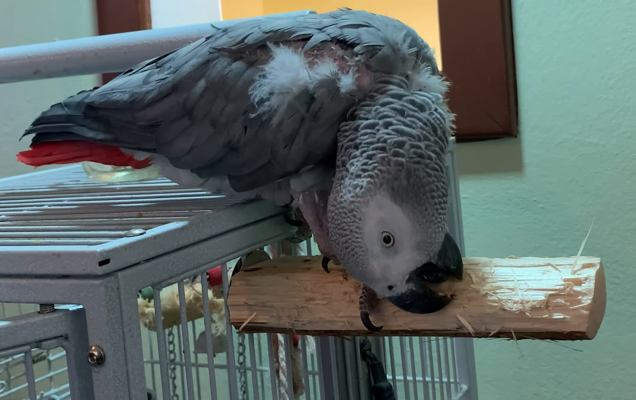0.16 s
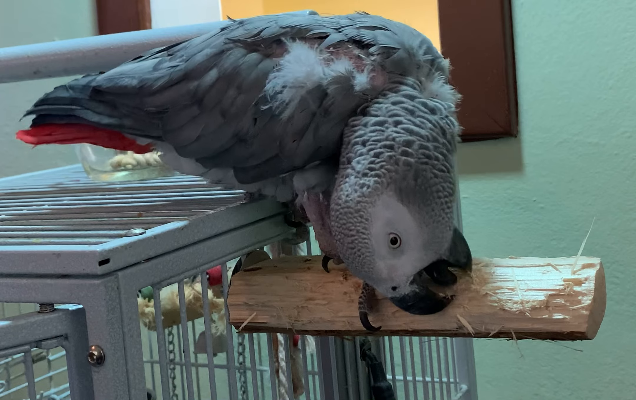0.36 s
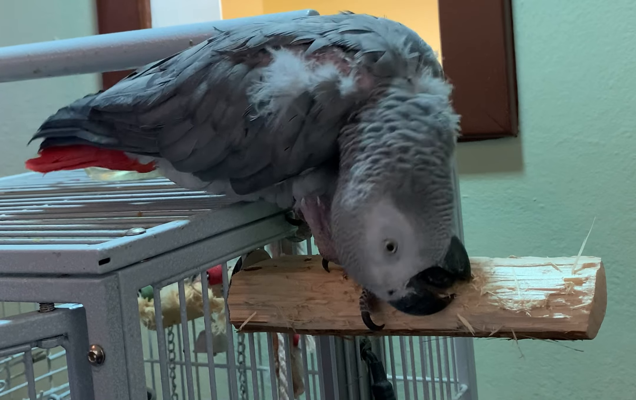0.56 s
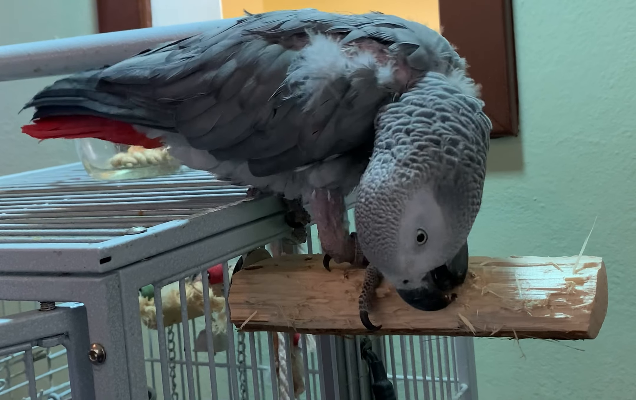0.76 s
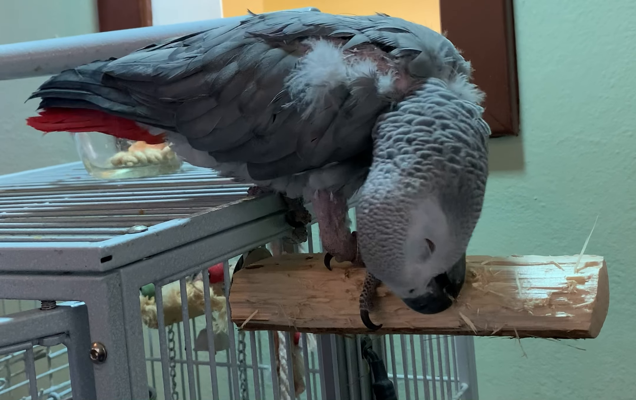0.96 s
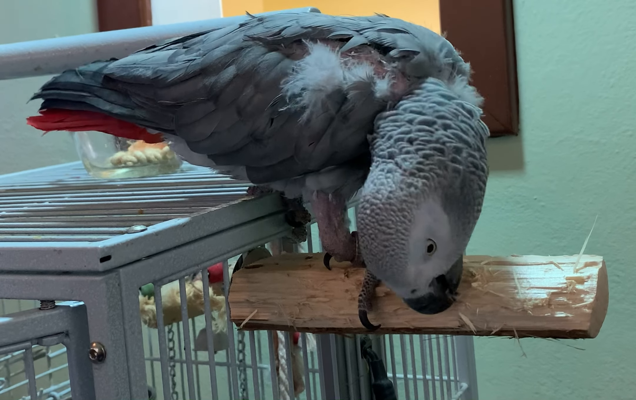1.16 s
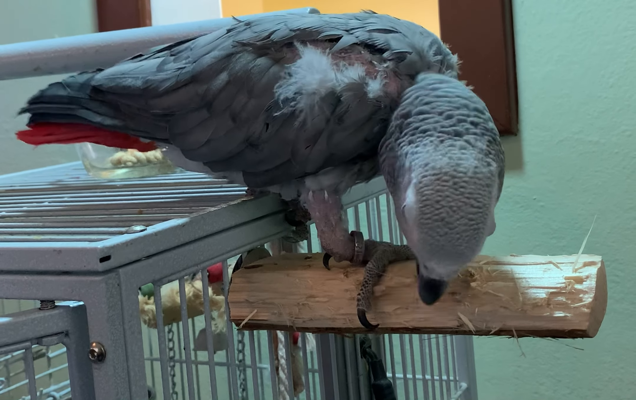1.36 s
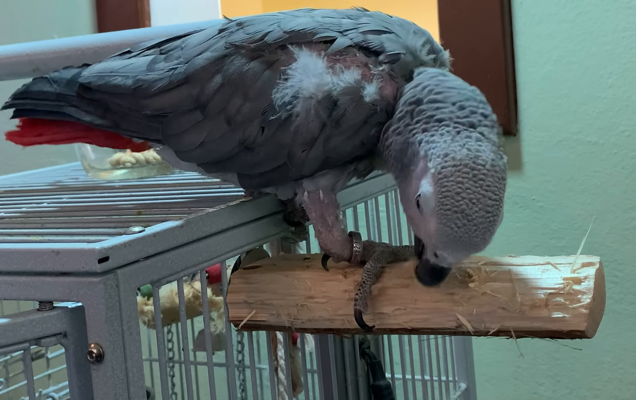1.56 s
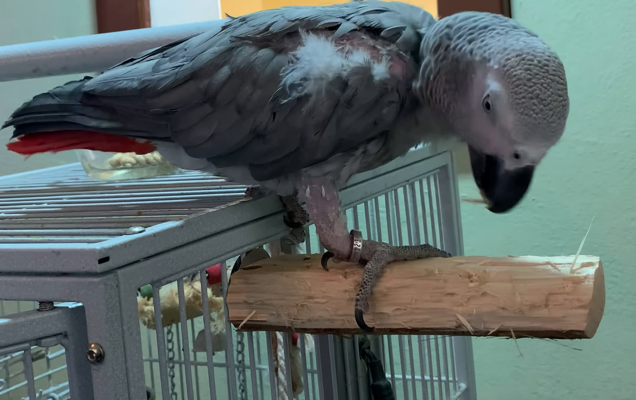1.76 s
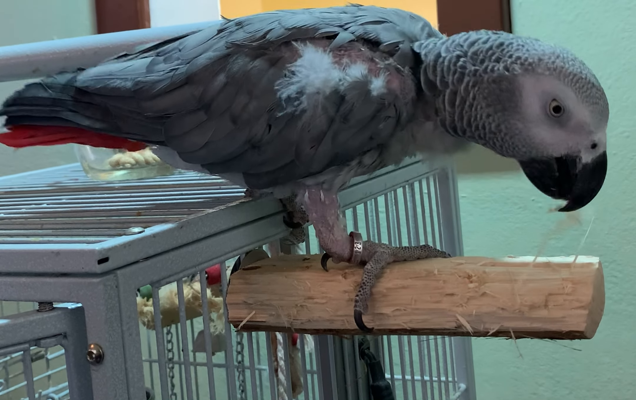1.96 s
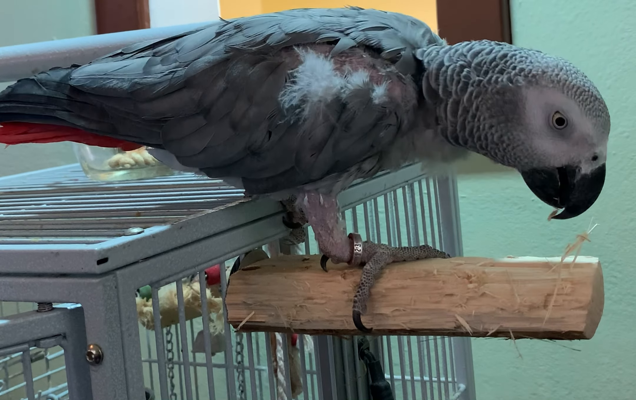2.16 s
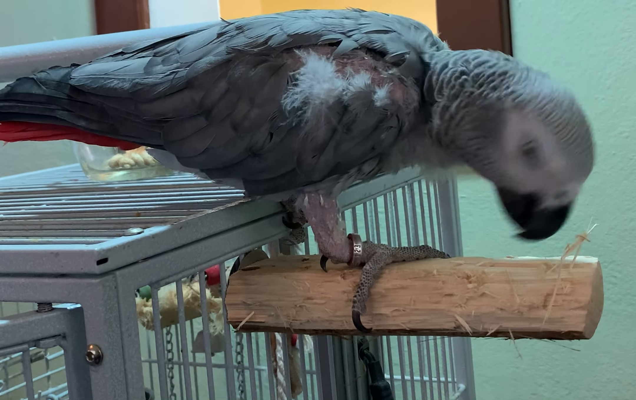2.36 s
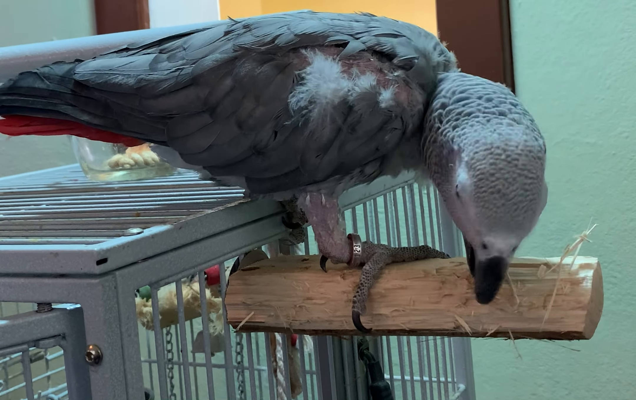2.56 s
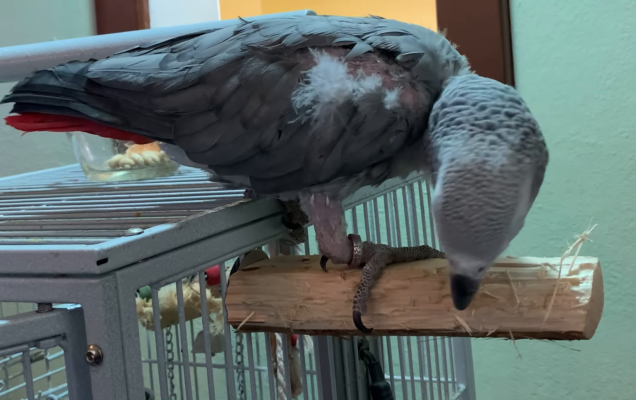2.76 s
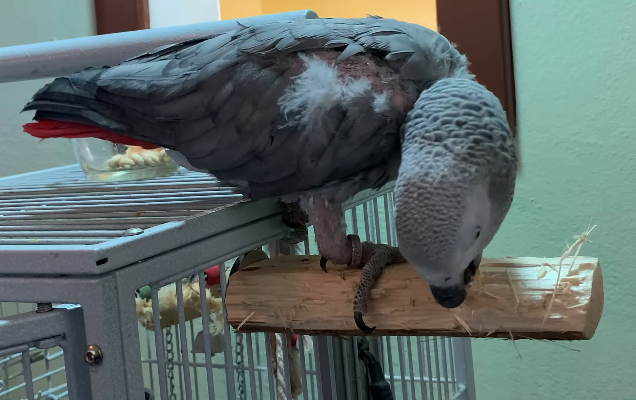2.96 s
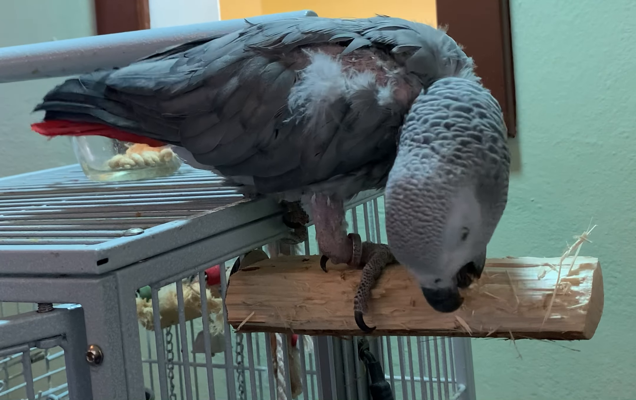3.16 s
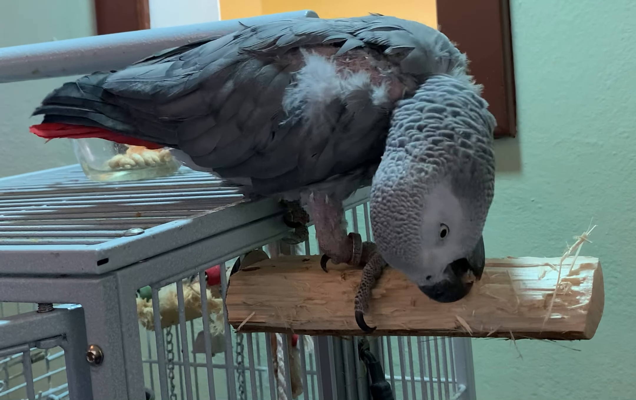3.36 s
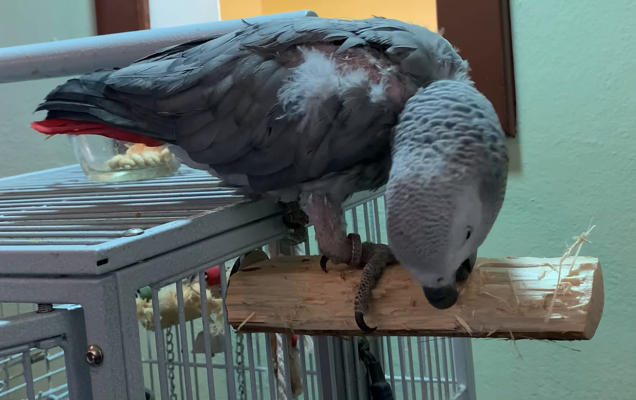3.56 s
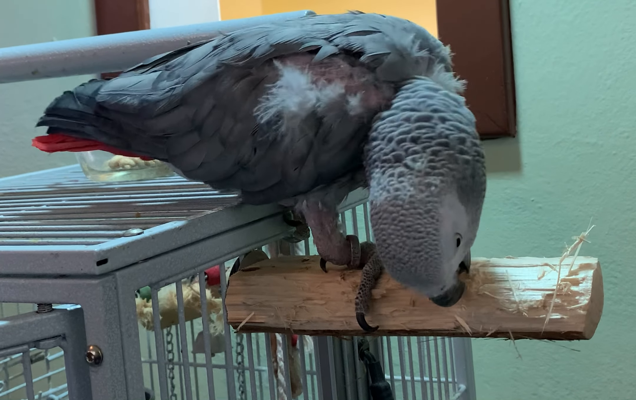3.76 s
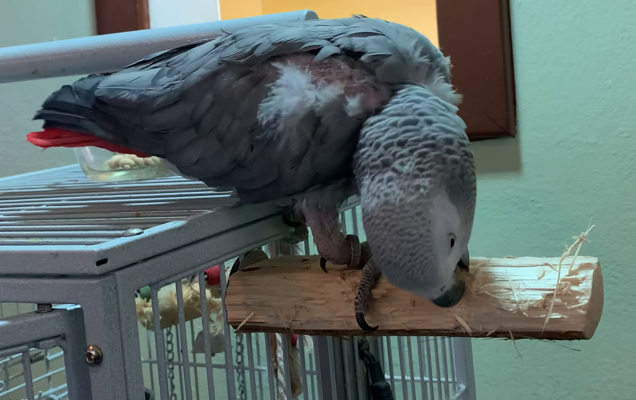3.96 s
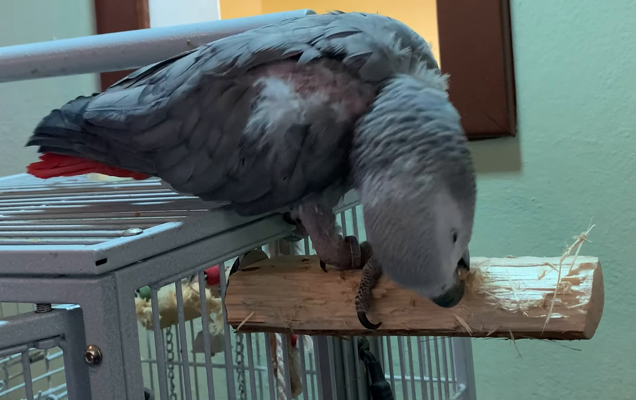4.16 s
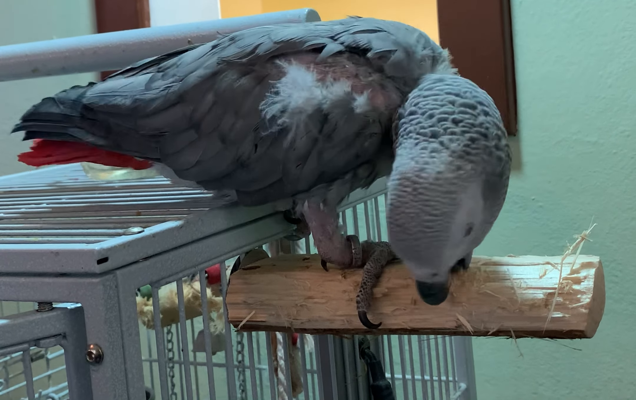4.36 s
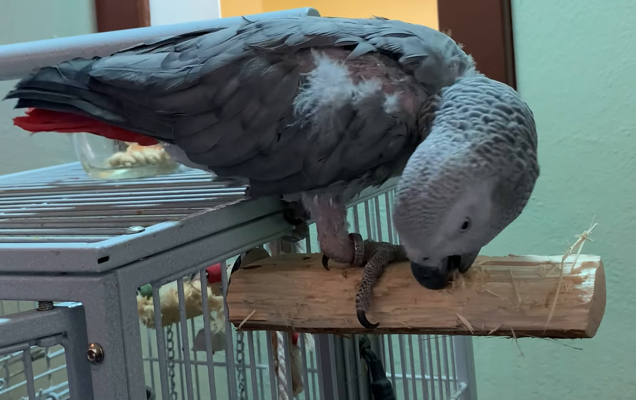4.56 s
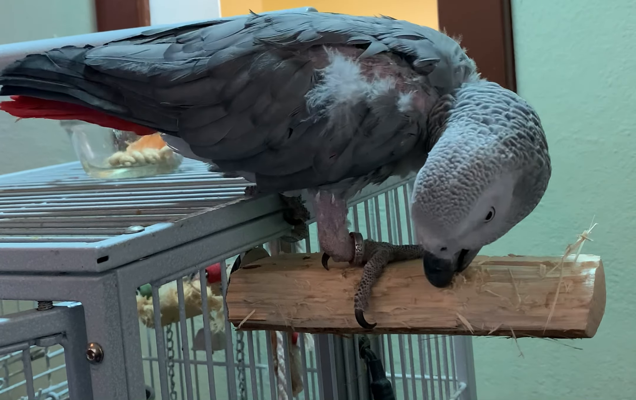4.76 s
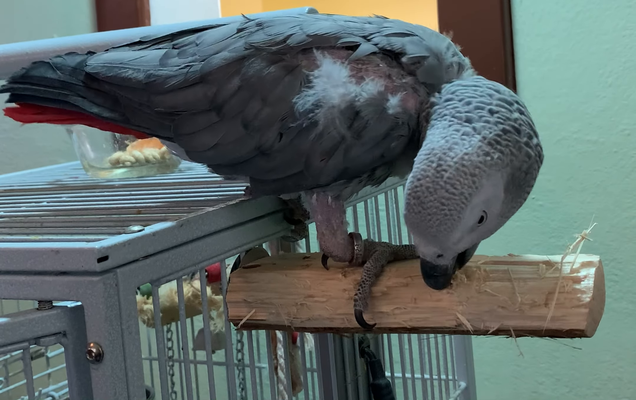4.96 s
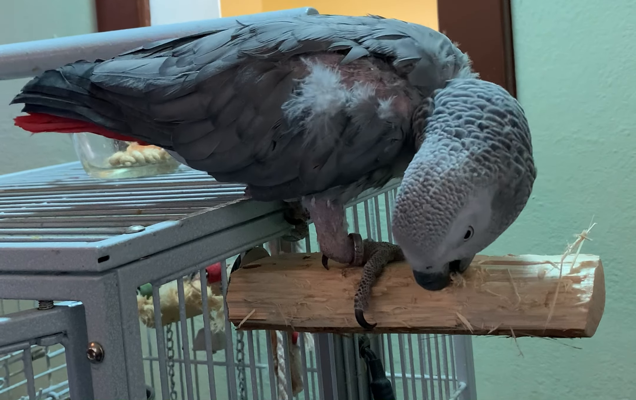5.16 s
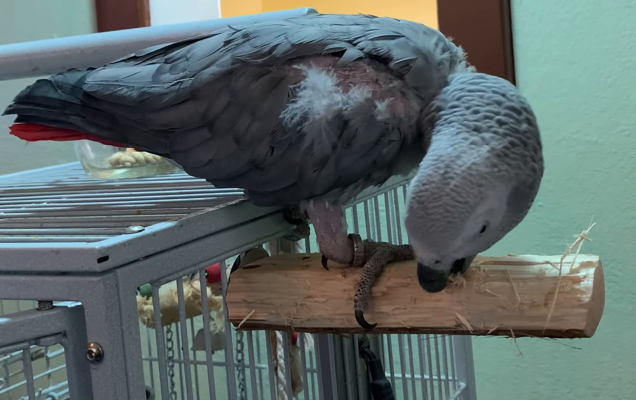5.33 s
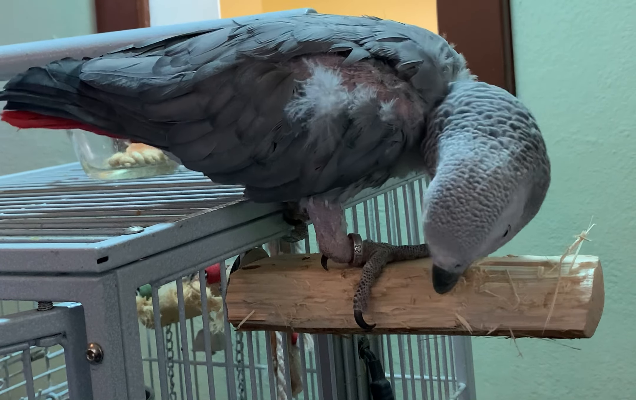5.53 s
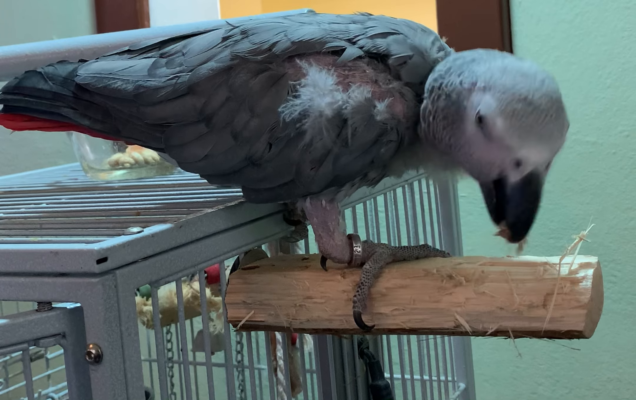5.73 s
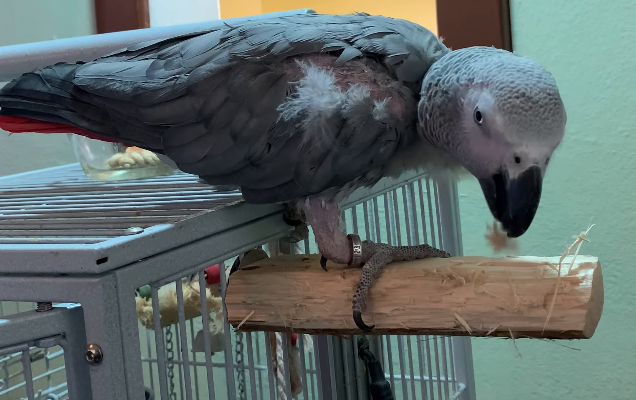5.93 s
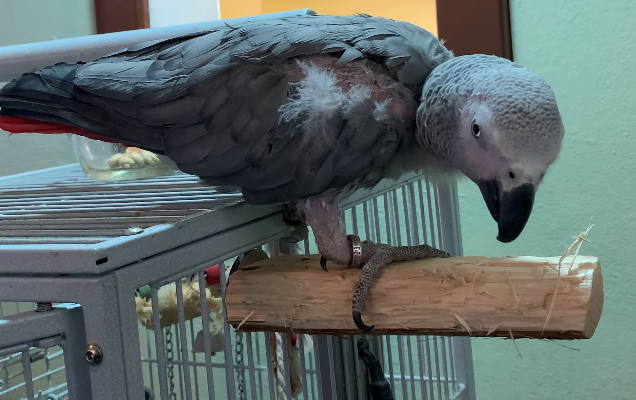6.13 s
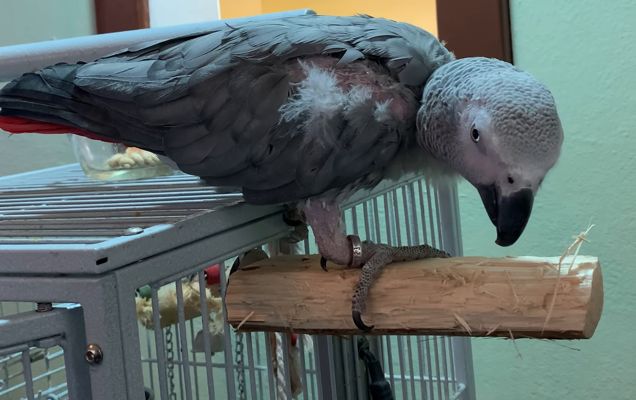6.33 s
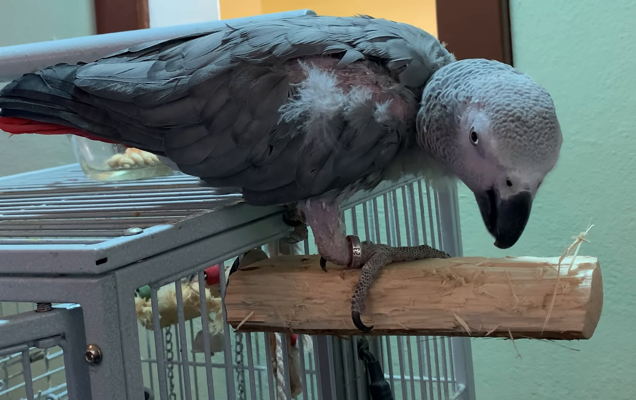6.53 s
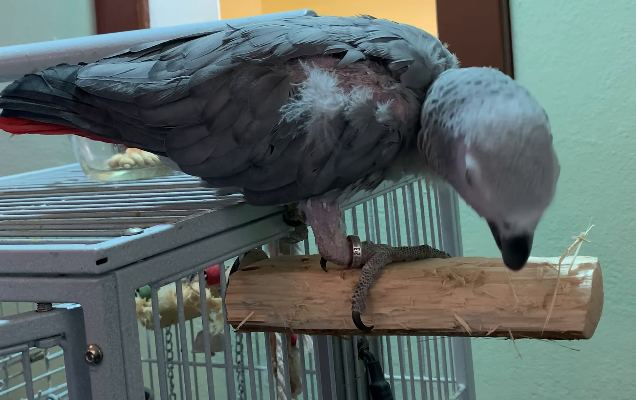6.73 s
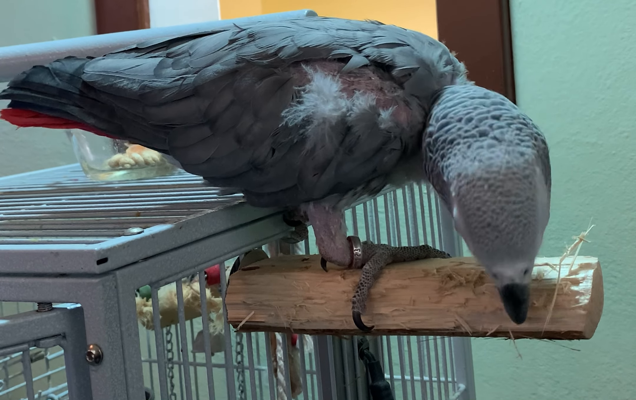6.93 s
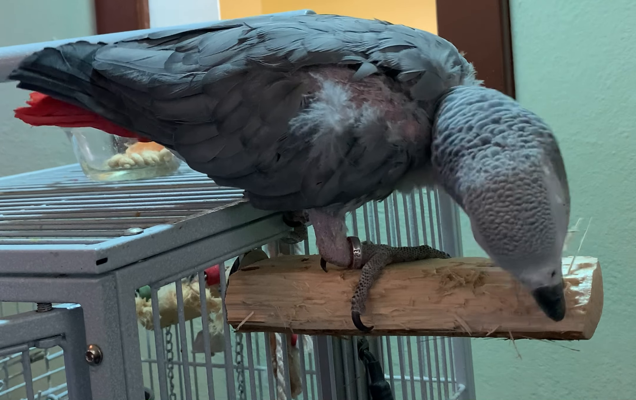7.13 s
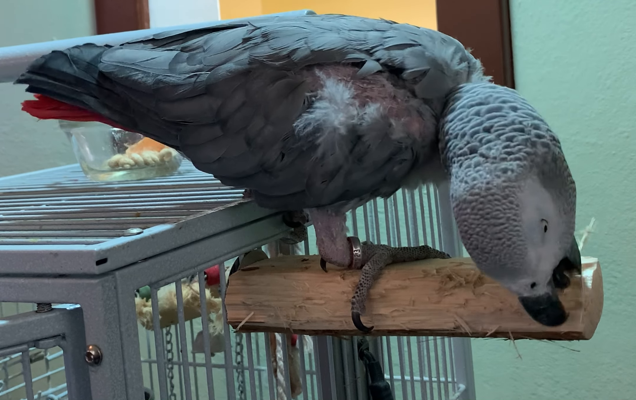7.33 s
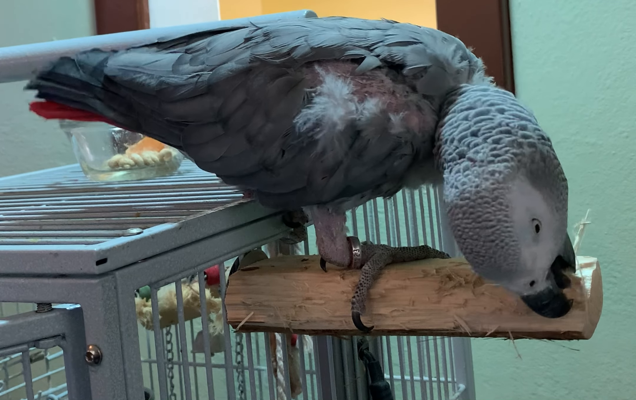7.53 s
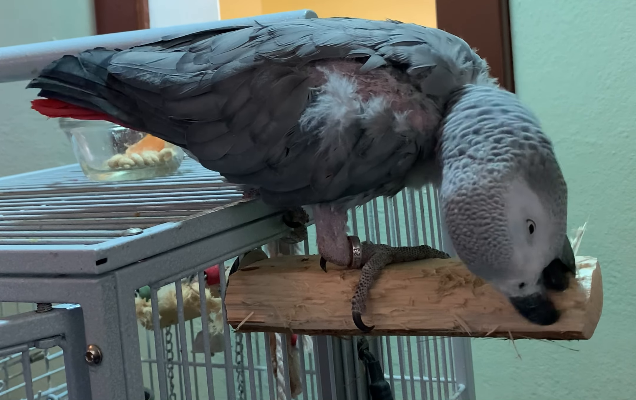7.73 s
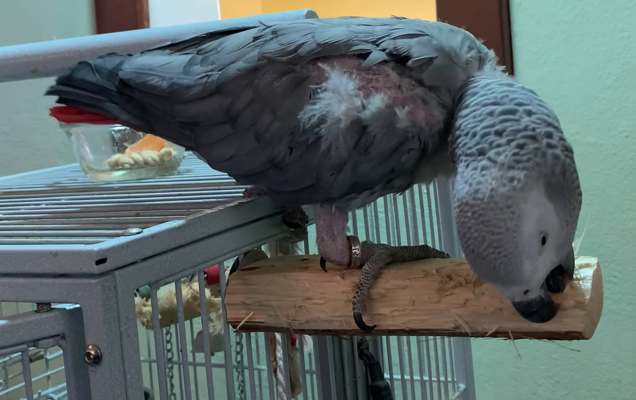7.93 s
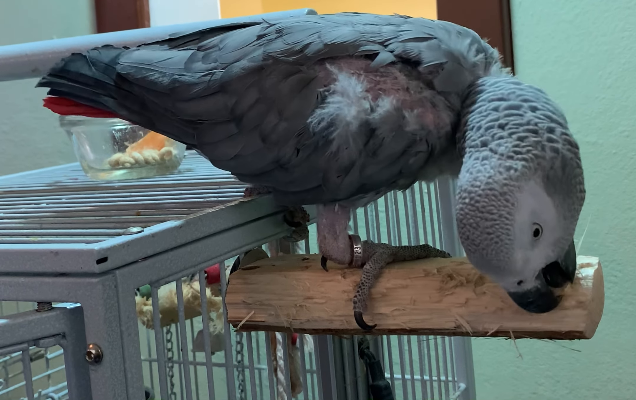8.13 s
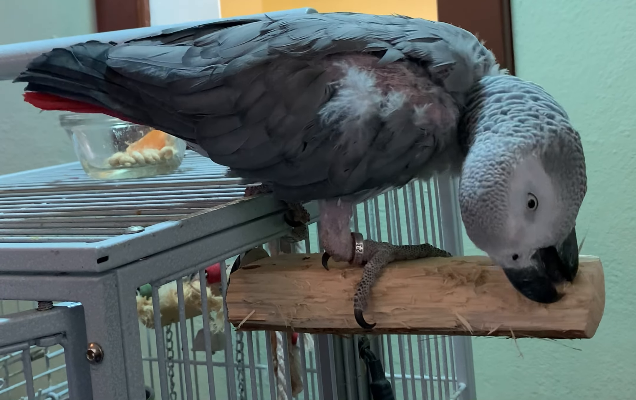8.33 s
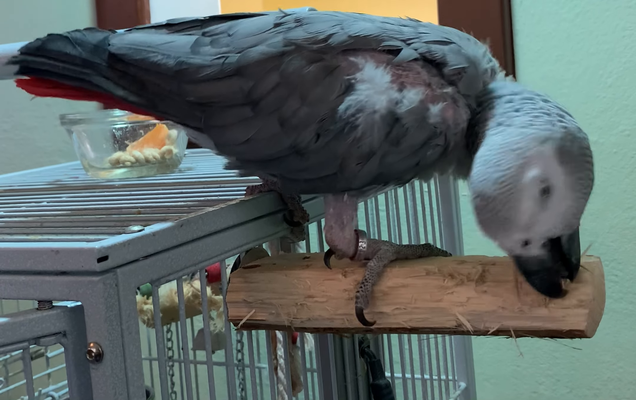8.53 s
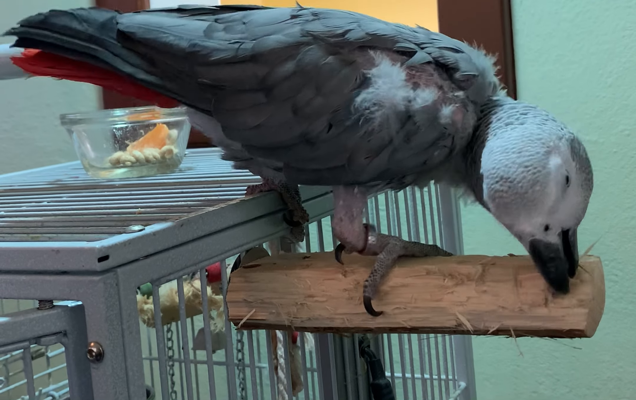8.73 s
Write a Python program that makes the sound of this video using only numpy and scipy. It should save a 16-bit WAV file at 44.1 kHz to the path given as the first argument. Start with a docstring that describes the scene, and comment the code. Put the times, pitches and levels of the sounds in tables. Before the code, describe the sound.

A parrot gnaws a wooden perch in a quiet indoor room, heard close in stereo over a soft, wavering low hum. From 0 to 1.8 s come uneven bites: fine dry crackle, ticking splinters, hollow little knocks around 0.5 and 0.9 s, sharp snaps near 1.6 s, and very faint brief beak squeaks. From 1.8 to 2.8 s it is nearly still, with only faint ticks. Gnawing returns at 2.9 s, with a dense crunching cluster at 3.2-3.8 s, a strong crack at about 4.5 s, lighter nibbling around 5 s, and hard snaps at 5.5 and 5.6 s. Mostly hum remains from 5.75 until 7.1 s. Then bright tearing resumes, snapping at 7.5 and 7.65 s, cracking sharply at 8.0 s, and ending in thick, fizzy, crisp crunching from 8.4 to 8.8 s. Short reflections and a light cage ring surround the wood.

```python
"""In a quiet room, a parrot gnaws a wooden perch on top of its cage.
Each bite tears fibres in fine crackle (noise grains) and grates the perch; splinters snap as short bursts.
The snaps jolt the perch into hollow knocks or ticks (decaying modes) and the cage rings on; the beak
squeaks briefly (unsteady sines). A low hum (narrow bands of noise) stands out of the room's air. Reflections
and a fading tail surround the wood, all heard in stereo, the right channel lagging in the treble."""
import sys
import numpy as np
from scipy import signal
from scipy.fft import rfft, irfft, next_fast_len
from scipy.io import wavfile

SR = 44100
rng = np.random.default_rng(int(sys.argv[2]) if len(sys.argv) > 2 else 0)


def store_wav(level_fs):
    """Save 16-bit WAV to argv[1]."""
    pcm = np.round(np.clip(np.atleast_2d(level_fs), -1, 1) * 32767)
    wavfile.write(sys.argv[1], SR, pcm.T.astype(np.int16))


N = 387638
TIME = np.arange(N) / SR
SIZE = next_fast_len(N + SR)
FREQS = np.maximum(np.arange(SIZE // 2 + 1) * SR / SIZE, 1)
CUTOFF_HZ = 16500
GRIP_S = .016  # time the beak needs to take hold

# bites, each a pull of the beak that tears fibres; levels are relative, set before the layer gains:
# (start t/s, length/s, level at mid-pull/dB, swell over the pull/dB, brightness weight/dB,
#  grating passed to the perch/dB, hardness of the grating/dB per octave above 1 kHz)
BITES = [(0.0, 0.081, -54.5, -14, -2.0, -5, 3), (0.12, 0.062, -58, 1, 5, -7, 4),
         (0.34, 0.05, -80, -1.5, -6.5, 13, 1), (0.453, 0.18, -65.0, -0.5, -8.5, 0.5, 1),
         (0.68, 0.051, -79, 2.0, 11, -1.5, 2.0), (0.77, 0.21, -69.5, -3, 5.0, 13, -10),
         (1.064, 0.09, -68.0, -2, -1, 5, -6), (1.169, 0.013, -60, 16, -2, -7.0, 1.5),
         (1.236, 0.13, -58, -1, 12, 8, 3), (1.516, 0.15, -71, 28, 6, 2, 5),
         (1.767, 0.023, -66.5, -7.0, -3, -4.5, -2), (2.525, 0.22, -79.0, -1, -9, -12, -0.5),
         (2.872, 0.11, -60, 16, 7.0, -1.5, 4), (3.01, 0.055, -73, -2.5, 5, 3.5, -1),
         (3.192, 0.17, -54.5, 1, 2, -0.5, 2), (3.443, 0.14, -72.5, -11, 8.0, 0.0, 4),
         (3.592, 0.028, -56, -9.0, 1, -5, 0), (3.647, 0.15, -53, -8, 5, -2.5, 3.5),
         (3.792, 0.038, -65.5, -2, 4, 14, -3), (4.018, 0.04, -50, 5, 3, -2, -1),
         (4.07, 0.1, -62.5, -6, -2, 2.0, 1.5), (4.2, 0.0594, -68, -2.0, 13.5, -0.5, 0.5),
         (4.362, 0.135, -48, 8, 6, -3.5, 3), (4.517, 0.21, -68.0, -21, 2.5, -4.5, -1),
         (4.763, 0.13, -63.5, -14, -5, -4, -6), (5.062, 0.044, -64.5, 6.0, 1, 0, -1),
         (5.165, 0.125, -65, -12.5, 5.0, -5, 0.5), (5.335, 0.066, -72, 2.0, -4.0, -4, 1),
         (5.444, 0.1, -50.5, 12, 1.5, -9.0, 5.5), (5.725, 0.028, -71.5, 0.5, -6.5, -8.5, 1),
         (7.105, 0.25, -77, -1, 3.0, 0.5, 4), (7.382, 0.11, -57, 4, -0.5, 0, 10),
         (7.613, 0.034, -53.5, 9, -4, -3, 6), (7.736, 0.05, -69.5, -9, 22.0, -3.0, 4.0),
         (7.941, 0.11, -58.5, -6.5, 8.5, 9, 2), (8.05, 0.16, -64, -9, 5, -8, 8.5),
         (8.32, 0.1, -64.5, -3, 1.5, 11.5, 1.5), (8.437, 0.1, -54.5, 0, 8, 5.5, 6.0),
         (8.53, 0.066, -47.5, 14, 16, 1.0, 8), (8.625, 0.052, -61, -3, 8, 6, 4),
         (8.692, 0.095, -48.5, -2, 17.0, -1, 9.0)]
# splinters snapping; levels are relative, set before the layer gains:
# (t/s, level/dB, upper over lower treble/dB, jolt given to the perch/dB, fracture time/ms,
#  hardness of the jolt/dB per octave above 1 kHz, pitch of the splinter f/Hz)
SNAPS = [(0.0228, -47.0, 2, -61.5, 1.5, 4, 15000), (0.043, -55.5, 3.5, -77.0, 0.33, 1, 11000),
         (0.077, -42.0, 7, -79.5, 1.2, 3.5, 15000), (0.118, -52.0, 5, -85, 0.6, 1, 11000),
         (0.142, -52.0, 8.0, -77.0, 0.4, 3, 11000), (0.172, -54.0, 9.0, -79.0, 0.4, 5, 15000),
         (0.183, -47, 3, -86, 1.5, -3, 15000), (0.3834, -48, -3.5, -65, 0.64, -1.5, 6600),
         (0.4576, -42, -3.0, -60.5, 1.0, 5, 11000), (0.4665, -35, 2, -43.5, 0.74, -4.0, 14500),
         (0.507, -54.5, 4.5, -78.0, 0.34, 2.5, 11000), (0.545, -29.5, -3.5, -71, 2.1, 11, 6700),
         (0.793, -53, 8, -82.0, 0.4, 1, 15000), (0.851, -54.0, 23.0, -75, 0.6, 0, 15000),
         (0.898, -54, 14.0, -81.0, 0.4, 3, 15000), (0.904, -55.0, 9.5, -80.0, 0.4, 3, 15000),
         (0.922, -49, 12.5, -77, 0.4, 7, 15000), (0.939, -32, 4.5, -43, 1.2, -1.5, 10500),
         (1.06, -49.5, 9, -76, 0.6, 5, 10800), (1.178, -52, 8.0, -59, 1.0, -5, 11000),
         (1.243, -46.0, 7.0, -77, 1.0, 4, 15000), (1.2565, -36.5, 8, -65, 1.6, 2.0, 10700),
         (1.3893, -40.0, 4, -54, 2.7, 1.0, 6840), (1.409, -55, 10.5, -78.0, 0.4, 3, 15000),
         (1.513, -57, 20.0, -79.0, 0.4, 3, 15000), (1.526, -39.5, 3, -64.5, 0.5, 3, 6800),
         (1.5847, -45, 18.0, -66, 0.5, 6, 15000), (1.632, -34.5, 13.0, -73, 1.0, 3.0, 14500),
         (1.6408, -37.5, 1.5, -56, 0.69, 4, 7140), (1.8, -61, 20.0, -84, 0.6, 4.0, 10400),
         (2.68, -63.0, 12.0, -84, 0.6, -2, 15000), (2.7726, -60.0, 5, -66, 0.6, -2, 7000),
         (2.97, -38.5, 4.0, -55, 0.75, 2, 11000), (2.9866, -41, 5.0, -56.5, 0.81, -4, 11000),
         (3.2533, -39.0, 13, -66.5, 1.0, 4.0, 15000), (3.2622, -27.0, -3, -41, 2.8, 0.0, 6600),
         (3.276, -34, 4.5, -54, 1.7, 1, 7000), (3.2894, -34, 3, -52.5, 1.0, -1, 7000),
         (3.33, -29, 10, -69.0, 1.1, 4, 15300), (3.3367, -25.5, 5.5, -47.5, 2.4, -1, 6800),
         (3.3551, -37.0, 11, -55, 1.0, -4, 15000), (3.439, -57, 5.5, -83.0, 0.4, 5, 11000),
         (3.494, -62, 15.5, -82.0, 0.4, 3, 15000), (3.5944, -51, 6, -60, 0.6, -2, 6860),
         (3.6, -55, 6, -70, 0.4, 3, 11000), (3.605, -48.0, 2, -75, 0.4, 5, 6600),
         (3.652, -49, 4, -71.0, 0.4, 6, 11000), (3.6662, -36.5, 0, -67, 2, 8.5, 6200),
         (3.6876, -48, 4.0, -77, 0.6, -1, 7500), (3.704, -44, 6, -72, 0.8, 0, 11000),
         (3.72, -40, 4, -69, 0.4, 3, 11000), (3.731, -43.0, 7.0, -76, 0.6, 1, 11000),
         (3.747, -30.5, 8.0, -55, 0.63, 2.5, 15000), (3.784, -50.0, 4.0, -73, 0.4, 1, 11000),
         (3.918, -57, 4, -73, 0.4, 3.0, 15000), (3.932, -52, 1.0, -61, 0.8, 1, 7000),
         (4.029, -50, 8, -64.5, 0.5, 7.5, 14500), (4.04, -41.0, 14, -65.5, 2.2, -2, 14500),
         (4.079, -50.5, 8.5, -73, 0.4, 2, 11000), (4.099, -43, 13, -61.5, 0.4, 2.5, 15000),
         (4.117, -44.5, -2, -60.5, 0.4, 0.5, 6240), (4.164, -58, 5, -80.5, 0.4, 3, 11000),
         (4.2765, -44.5, 25.5, -75.5, 0.36, 1.5, 15000), (4.38, -44.5, 15.0, -75.5, 1.0, 1.5, 15100),
         (4.392, -33.5, 9.5, -72.5, 1.3, 3.0, 11000), (4.435, -33.5, 10, -63, 1.5, -0.5, 15000),
         (4.4598, -20.5, 8, -39.5, 0.36, -1, 14500), (4.5002, -44.5, -5, -69.5, 0.6, 2.0, 6600),
         (4.591, -53.5, 12.0, -75, 0.4, 0, 15000), (4.637, -54, 11, -70, 0.6, 2.5, 7000),
         (4.727, -58, 6, -81, 0.4, 3, 11000), (4.784, -55, 1, -76, 0.4, 0, 11000),
         (4.819, -42, 1, -74, 0.54, -1, 15100), (4.833, -41, 3.0, -78.0, 0.4, 3.5, 15000),
         (4.8436, -43, -7, -81, 0.7, 0, 6200), (4.893, -53, -2, -76.0, 0.4, 0, 11000),
         (4.902, -35, 1.5, -58, 0.3, -5, 6300), (4.9998, -59.0, 17.0, -83.0, 0.3, 4.0, 15000),
         (5.0646, -48.0, 2.0, -80.0, 0.5, 7, 6800), (5.092, -46.5, -5, -56.5, 2.0, -6, 6400),
         (5.167, -62, 5.0, -81.5, 0.4, 3, 11000), (5.1756, -50.5, 10, -75.0, 0.6, 4.5, 7000),
         (5.192, -45, 5.5, -77, 1.7, 2, 10900), (5.227, -58, 7.0, -80.5, 0.4, 4.5, 11000),
         (5.242, -56.0, 10, -81.0, 0.4, 3, 15000), (5.418, -49, 17.5, -75, 2.1, 1, 11200),
         (5.474, -48, 9.5, -71.5, 0.4, 4.5, 15000), (5.5226, -26, 0.0, -50.5, 1.1, 0.5, 6200),
         (5.528, -37.5, -2, -60.5, 0.67, -0.5, 6390), (5.542, -40.0, -4, -58.5, 2.0, 0, 6400),
         (5.6024, -20.5, -7.5, -49.5, 0.23, 0, 6520), (6.885, -65, 19, -87.0, 0.6, 4, 11000),
         (6.917, -68.5, 16.0, -84, 0.6, 2, 15000), (7.26, -51.5, 9, -71, 0.58, 6.5, 11000),
         (7.4193, -34.5, 4.5, -58, 4.2, 8, 10700), (7.469, -41, 15, -78, 1.5, -2, 7400),
         (7.484, -29, 6, -57, 3.1, 7.5, 7340), (7.622, -35, 17, -72, 3.6, 9.5, 10400),
         (7.65, -27.5, 2.5, -59.5, 0.74, 9, 7600), (7.7233, -57.0, 17.0, -84.0, 0.5, 5, 15000),
         (7.74, -45.0, 23, -83.0, 3.0, 6, 10200), (7.761, -46, 20, -81, 0.8, 9, 10500),
         (8.014, -21, 22, -58, 0.77, 5, 12100), (8.0181, -28.0, 12, -57.5, 1.5, 8, 11000),
         (8.0363, -35.0, 10.0, -64, 2.0, 9, 11000), (8.0696, -50, 12.0, -86.0, 0.6, 7.0, 11000),
         (8.1, -55.0, 6.0, -78, 0.4, 6, 11000), (8.1094, -45.0, 4.0, -87.0, 0.6, 7.0, 11000),
         (8.1223, -39.5, 18.0, -84.0, 0.6, 7.0, 11000), (8.1529, -52.0, 18.0, -87, 0.46, 7.0, 15000),
         (8.168, -35, 16.0, -76.0, 0.66, 9, 14700), (8.1817, -42.5, 0.0, -55.5, 1.0, 6.0, 7500),
         (8.302, -52, 20, -91, 0.5, 4, 14500), (8.319, -49.5, 4.0, -80, 0.6, 3, 10500),
         (8.331, -52, 7.0, -70, 0.4, 4, 11000), (8.362, -58, 12.0, -76, 0.49, 8, 15000),
         (8.393, -53, 6, -76.0, 0.4, 6, 11000), (8.3993, -44, -1, -69, 0.5, 6, 10500),
         (8.412, -47, 6, -77, 0.45, 1, 11000), (8.4401, -34.5, -1, -55.5, 0.52, 4, 6100),
         (8.4801, -33.0, 1, -53.5, 1.2, 5.0, 6400), (8.497, -42.0, 6, -70, 0.52, 1, 11000),
         (8.5234, -31.5, 3.0, -57, 1.3, 7.5, 11500), (8.5891, -35, 15, -69, 3.8, 9, 12000),
         (8.597, -32, 13.0, -71, 2.8, 4, 12000), (8.654, -52.0, 11.0, -76, 0.4, 6, 15000),
         (8.6755, -37.5, 18, -91, 1.4, 7.0, 10500), (8.7095, -33, 11, -73, 1.8, 9, 12500),
         (8.724, -35.5, 9, -86.0, 6.0, 7.0, 10400), (8.7576, -34, 6, -71, 2.3, 14.5, 6500)]
# modes of the perch when struck freely: (f/Hz, relative level/dB, t60/s)
PERCH = [(636, -13.5, 0.021), (760, -4, .019), (906, -4, .036), (1085, -2.5, 0.028), (1350, -11, 0.022),
         (1508, -5.5, 0.033), (1680, -12.5, 0.012), (2020, -6, 0.01), (2590, -7, 0.008), (3150, -6.5, 0.01),
         (3460, -7, .009), (3870, -10, 0.0072)]
# colour of breaking wood: (f/Hz, relative density/dB per Hz)
WOOD = [(300, -28.5), (800, -22), (1500, -14), (2200, -25.5), (3300, -9.5), (4100, -8), (5100, 2),
        (6400, 2.5), (7400, -1.5), (9300, 1.5), (10800, -2.5), (12400, -5.5), (14000, 1), (15300, 3.5),
        (16300, -22)]


def from_db(db):
    """Decibels to gain."""
    return 10 ** (np.asarray(db) / 20)


def at_hz(points, hz):
    """Read a table on a log-frequency axis."""
    f, value = np.transpose(points)
    return np.interp(np.log(hz), np.log(f), value)


def shaped(x, gain):
    """Filter by a gain for each frequency."""
    return irfft(rfft(x, SIZE) * gain, SIZE)[..., :N]


def split_band(x, order, hz, kind):
    """Keep the part of a sound below ("low") or above ("high") a frequency."""
    return signal.sosfilt(signal.butter(order, hz, kind, fs=SR, output="sos"), x)


def causal(points):
    """A spectrum in dB as a minimum-phase response, of unit power below the cutoff: nothing sounds early."""
    cepstrum = irfft(np.log(from_db(at_hz(points, FREQS))), SIZE)
    cepstrum[1:SIZE // 2] *= 2
    cepstrum[SIZE // 2 + 1:] = 0
    gain = np.exp(rfft(cepstrum))
    return gain / np.sqrt(np.mean(abs(gain) ** 2 * (FREQS < CUTOFF_HZ)))


def diffuse_noise():
    """White stereo noise, alike in both channels as far as a diffuse field is."""
    # likeness of the two channels for diffuse sound: (f/Hz, correlation 0-1)
    likeness = [(140, .995), (290, .95), (640, .66), (1400, .54), (2800, .4), (4500, .8), (6500, .9),
                (15000, .92)]
    alike = np.clip(at_hz(likeness, FREQS), 0, 1)
    mid = shaped(rng.standard_normal(N), np.sqrt((1 + alike) / 2))
    side = shaped(rng.standard_normal(N), np.sqrt((1 - alike) / 2))
    return np.array([mid + side, mid - side])


def background():
    """Room air with narrow humps of hum standing out of it."""
    # steady air of the room: (f/Hz, density/dB per Hz)
    air = [(20, -99.5), (35, -81), (55, -68.5), (110, -74), (180, -64.5), (225, -75), (315, -71.5),
           (385, -83), (600, -83.5), (820, -92), (1500, -96.5), (2100, -103), (3200, -106.5), (4300, -116),
           (16000, -128)]
    # wavering hum of an appliance: (f/Hz, width/Hz, rms level/dB)
    hum = [(72.6, 8, -59.5), (95.9, 2.2, -56.5), (138.3, 12, -48), (148.2, 0.82, -54.5), (243.6, 8, -59),
           (285.7, 15, -58.5), (447, 4.7, -71.5)]
    density = from_db(at_hz(air, FREQS)) ** 2
    for hz, width, level_db in hum:
        hump = 1 / (1 + ((FREQS - hz) / (width / 2)) ** 2) ** 2
        hump_power = hump.sum() * SR / SIZE
        density = density + from_db(level_db) ** 2 * hump / hump_power
    return shaped(diffuse_noise(), np.sqrt(density * SR / 2))


def fibres(per_s, spread_db, rub, grain_s, chips_per_s, chip_db, chip_spread_db, size=96, count=1500):
    """Tiny fibres part at random over the faint rub of the beak; at uneven intervals a small chip breaks off."""
    sizes = from_db(spread_db * np.minimum(rng.exponential(1, N), 3.5))
    energy = (rng.random(N) < per_s / SR) * sizes ** 2
    energy = energy / energy.mean()

    chip_at = (np.cumsum(rng.uniform(.2, 1.8, count)) * SR / chips_per_s).astype(int)
    chip_size = from_db(chip_db + chip_spread_db * rng.uniform(-1.2, 1, count))
    heard = chip_at < N
    energy[chip_at[heard]] += chip_size[heard] ** 2 * SR / chips_per_s

    grain_decay = np.exp(-2 * np.arange(size) / SR / grain_s)  # squared, as it shapes power
    power = np.convolve(energy, grain_decay)[:N]
    return np.sqrt(power / power.mean() + abs(rub)) * rng.standard_normal(N)


def pull(tilt, grating=False):
    """Strength of the fibres or their grating: each bite takes hold, swells or eases, and lets go.

    A positive tilt follows the brightness of the bites (thin fibres), a negative one opposes it (thick)."""
    release_s, grip_db = .045, 30  # the pull fades by grip_db over each grip or release time
    t, strength = TIME[::20], 0
    for start, length, level_db, swell_db, bright_db, grating_db, _ in BITES:
        before = np.maximum(start - t, 0) / GRIP_S
        after = np.maximum(t - start - length, 0) / release_s
        loose_db = grip_db * np.minimum(before + after, 10)
        progress = np.clip((t - start) / length, 0, 1)
        colour_db = tilt * bright_db / 2 + grating * grating_db
        pull_db = level_db + colour_db + swell_db * (progress - .5) - loose_db
        strength = strength + from_db(pull_db) ** 2
    return np.interp(TIME, t, np.sqrt(strength))


def tearing(crackle):
    """Thick fibres fill the lower treble and thin ones the upper, each as hard as the bite pulls them."""
    split_hz = 8800
    thick = pull(-1.1) * split_band(crackle, 4, split_hz, "low")
    thin = pull(0.88) * split_band(crackle, 4, split_hz, "high")
    return thick + thin


def struck(modes, hardness_db, vary_db, scatter, size=2000):
    """One ring of a body: the grip shifts and weights its modes, and a hard contact favours the high ones."""
    hz, mode_db, t60 = np.transpose(modes)[:, :, None]
    octaves = np.log2(hz / 1000)
    t = np.arange(size) / SR
    strength, shift = rng.standard_normal((2, len(modes), 1))
    gains = from_db(mode_db + hardness_db * octaves + vary_db * strength)
    decay = np.exp(-np.log(1000) * t / t60)
    tones = np.sin(2 * np.pi * hz * np.exp(scatter * shift) * t)
    return (gains * decay * tones).sum(axis=0)


def rasp(crackle, level_db, vary_db, scatter, damping_s):
    """The tearing fibres keep the perch grating, in a new colour with each bite; the beak damps its ring."""
    out = np.zeros(N + SR)
    drive = crackle * pull(-1.4, grating=True)
    edges = [0] + [round((bite[0] - GRIP_S) * SR) for bite in BITES[1:]] + [N]
    for first, last, (*_, hardness_db) in zip(edges, edges[1:], BITES):
        ring = struck(PERCH, hardness_db, vary_db, scatter)
        ring = ring * np.exp(-TIME[:len(ring)] / damping_s)
        grating = signal.fftconvolve(drive[first:last], ring / np.linalg.norm(ring))
        out[first:first + len(grating)] += grating
    return from_db(level_db) * out[:N]


def snaps(ring_db, reach_db, split_hz=8770, break_db=-10.5, splinter_s=0.0023, splinter_db=-22,
          ring_s=0.00033, uneven_db=4.0, size=1024):
    """Each snap is a sharp click, a grainy burst of fracture and a short splintering, with an instant's ring.

    A snap gains reach_db for each doubling of its fracture time; a faint first crack comes just before it."""
    first_crack_db, lead_s = -18, .007  # level against the snap, longest lead
    t, out = np.arange(size) / SR, np.zeros(N + size)
    _, _, _, _, fracture_ms, _, pitch = np.transpose(SNAPS)[:, :, None]
    fracture = from_db(break_db) * np.exp(-t / (fracture_ms / 1000))
    splintering = from_db(splinter_db) * np.exp(-t / splinter_s)
    click = t == 0
    ringing = click + from_db(ring_db) * np.exp(-t / ring_s) * np.cos(2 * np.pi * pitch * t)

    chance = rng.standard_normal((len(SNAPS), 2, size))
    grain = chance[:, 0] * from_db(uneven_db * chance[:, 1])
    bursts = click + grain / grain.std() * (fracture + splintering)
    wood_response = irfft(causal(WOOD), SIZE)[None, :size]
    for response in (ringing, wood_response):
        bursts = signal.fftconvolve(bursts, response, axes=1)[:, :size]
    bursts = split_band(bursts, 8, CUTOFF_HZ, "low")

    # thin splinters put more of their energy into the upper treble than thick ones
    low = split_band(bursts, 5, split_hz, "low")
    high = split_band(bursts, 5, split_hz, "high")
    for (s, level_db, bright_db, _, ms, *_), thick, thin in zip(SNAPS, low, high):
        ratio = from_db(bright_db)
        burst = thick / np.linalg.norm(thick) + ratio * thin / np.linalg.norm(thin)
        burst = burst / np.hypot(1, ratio)
        crack_s = max(s - lead_s * rng.uniform(0.29, 1), 0)
        for when, db in [(s, level_db), (crack_s, level_db + first_crack_db)]:
            at = round(when * SR)
            out[at:at + size] += from_db(db + reach_db * np.log2(ms)) * burst
    return out[:N]


def perch(jolt_db, vary_db, scatter):
    """Every snap jolts the perch: soft jolts give a hollow knock, hard ones a tick; the cage rings on."""
    # modes of the cage: (f/Hz, relative level/dB, t60/s)
    cage_modes = [(900, -25, 0.56), (940, -28, 0.45), (1063, -24, 0.45), (1280, -21, .19),
                  (1503, -26.5, .16), (2657, -29.5, 0.13)]
    rod, jolts = np.zeros((2, N + SR))
    for s, _, _, level_db, _, hardness_db, _ in SNAPS:
        at = round(s * SR)
        ring = struck(PERCH, hardness_db, vary_db, scatter)
        rod[at:at + len(ring)] += from_db(level_db) * ring
        jolts[at] = from_db(level_db)
    cage = signal.fftconvolve(jolts[:N], struck(cage_modes, 0, vary_db=3, scatter=0, size=16000))
    # so thin a rod radiates no bass
    return from_db(jolt_db) * split_band(rod[:N] + cage[:N], 3, 520, "high")


def squeaks(jitter):
    """The beak sticks and slips on the wood in a brief, unsteady whistle."""
    # beak squeaking on the wood: (t/s, length/s, pitch f/Hz, peak level/dB)
    whistles = [(0.331, 0.056, 3050, -67), (0.332, 0.06, 4080, -67), (1.034, 0.042, 7030, -60.5),
                (1.863, 0.017, 6820, -62), (2.766, 0.017, 6890, -65), (5.723, 0.034, 6350, -65)]
    out = np.zeros(N)
    for s, length_s, hz, level_db in whistles:
        at, swell = round(s * SR), np.hanning(round(length_s * SR))
        unsteady_hz = hz * (1 + jitter * rng.standard_normal(len(swell)))
        phase = 2 * np.pi * np.cumsum(unsteady_hz) / SR
        out[at:at + len(swell)] += from_db(level_db) * swell * np.sin(phase)
    return out


def room(x, early_db, early_s, tail_db, gap_s):
    """After a short gap, cage and wall scatter the sound back; the room dies away, treble first."""
    # reverberation time of the room: (f/Hz, t60/s)
    reverb_times = [(500, .4), (1500, .42), (4000, .26), (7000, .21), (11000, .15), (16000, .11)]
    size = SR // 2
    t = TIME[:size]
    noise = diffuse_noise()
    hz = np.maximum(np.arange(size // 2 + 1) * SR / size, 1)
    centres = np.geomspace(400, 16000, 9)
    spectrum, tail = rfft(noise[:, :size]), 0
    for centre, band in zip(centres, np.eye(len(centres))):
        part = irfft(spectrum * np.interp(np.log(hz), np.log(centres), band), size)
        tail = tail + part * np.exp(-np.log(1000) * t / at_hz(reverb_times, centre))
    early = noise[:, size:2 * size] * np.exp(-t / early_s)
    # each part is levelled by the energy of its left channel
    early = from_db(early_db) * early / np.linalg.norm(early[0])
    tail = from_db(tail_db) * tail / np.linalg.norm(tail[0])
    gap = np.exp(-2j * np.pi * FREQS * gap_s)
    return shaped(x, rfft(early + tail, SIZE) * gap)


def scene():
    """Breaking wood and the knocking perch in the humming room."""
    # fine fibres are brighter than splinters
    fine_colour = causal([(hz, db + 0.3 * np.log2(hz)) for hz, db in WOOD])
    crackle = fibres(per_s=500, spread_db=3.5, rub=0.012, grain_s=.00035,
                     chips_per_s=140, chip_db=-2.5, chip_spread_db=9.5)
    gnawing = from_db(-4.0) * shaped(tearing(crackle), fine_colour) + squeaks(jitter=0.21)
    snapping = from_db(18.5) * snaps(ring_db=-16.5, reach_db=0.5)
    # the room hears the splinters from all sides: less of their pitch, and more of the long fractures
    snapping_around = from_db(19.5) * snaps(ring_db=-17.0, reach_db=0.85)
    knock = perch(jolt_db=4.0, vary_db=1.5, scatter=0.024)
    knock = knock + rasp(crackle, level_db=-9.0, vary_db=4.0, scatter=0.05, damping_s=.003)
    wood_echo = room(gnawing + snapping_around, early_db=-7, early_s=0.00404, tail_db=-11.0, gap_s=.0018)
    knock_echo = room(knock, early_db=0.0, early_s=0.005, tail_db=-3.5, gap_s=.003)
    return gnawing + snapping + knock + wood_echo + knock_echo + background()


def record(dry):
    """The right channel lags in the treble; the top is cut."""
    # phase by which the right channel lags: (f/Hz, phase/rad)
    right_lag = [(0, 0), (1300, 0), (2500, 1.2), (3400, 1.3), (4720, 3.14), (7000, 6.28), (8900, 9.42),
                 (11100, 12.57), (13150, 15.71), (15300, 19.0), (16500, 19.2)]
    lag = np.interp(FREQS, *np.transpose(right_lag))
    pair = np.array([dry[0], shaped(dry[1], np.exp(-1j * lag))])
    return signal.sosfilt(signal.ellip(10, .1, 80, CUTOFF_HZ, fs=SR, output="sos"), pair)


dry = scene()
out = record(dry)
store_wav(out)
```